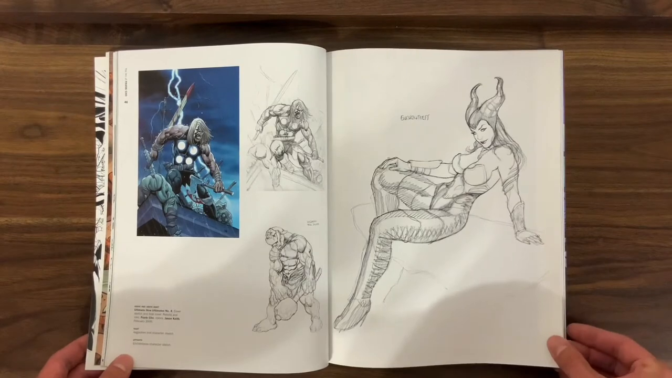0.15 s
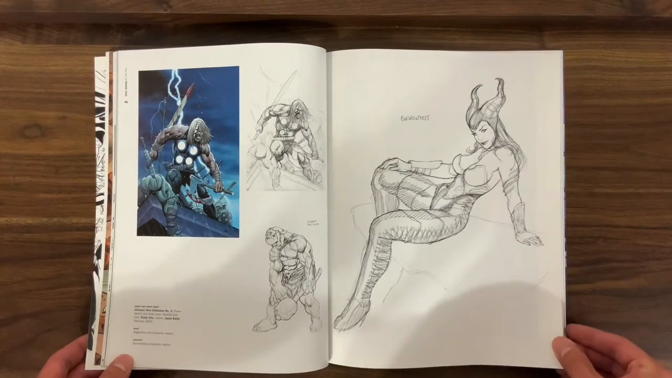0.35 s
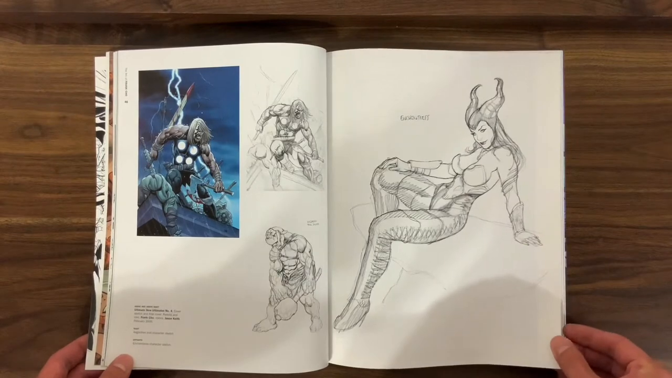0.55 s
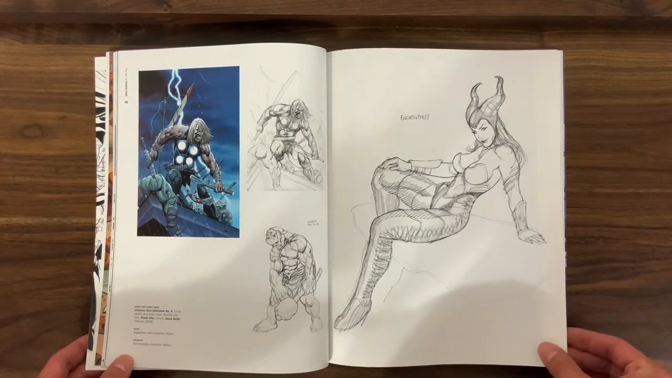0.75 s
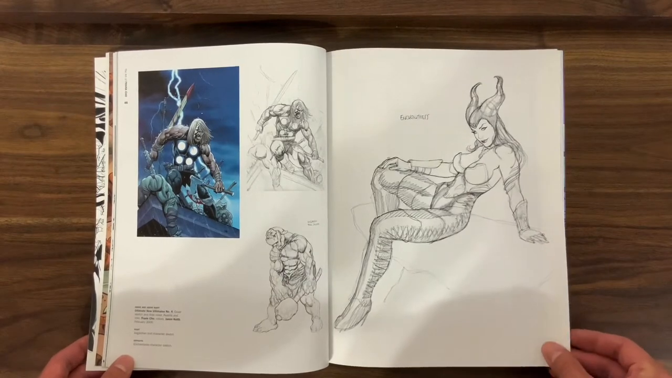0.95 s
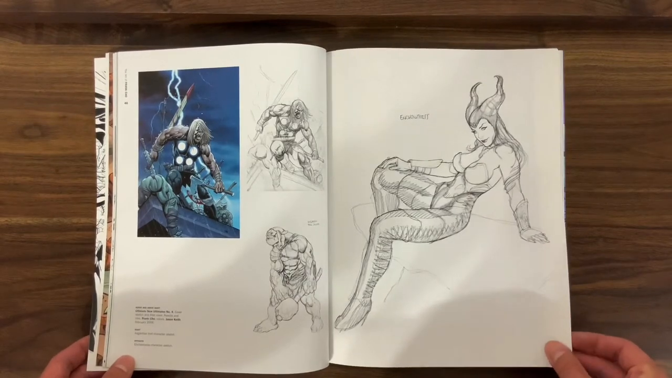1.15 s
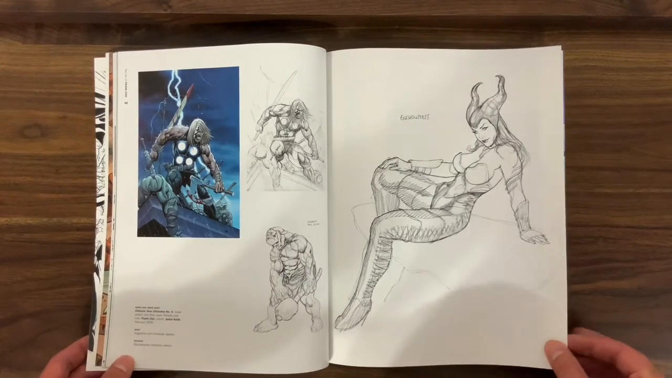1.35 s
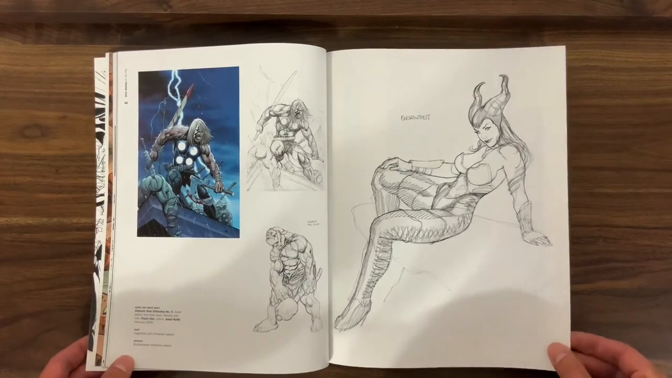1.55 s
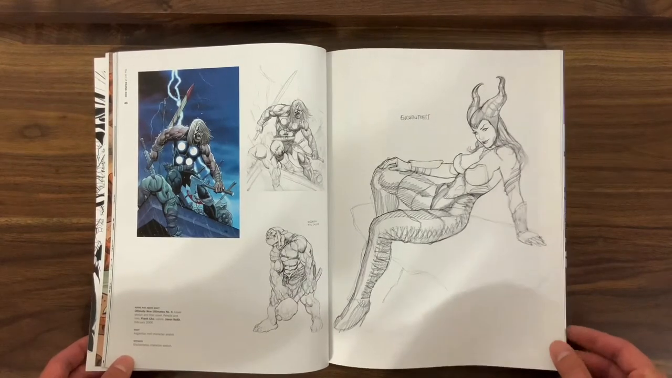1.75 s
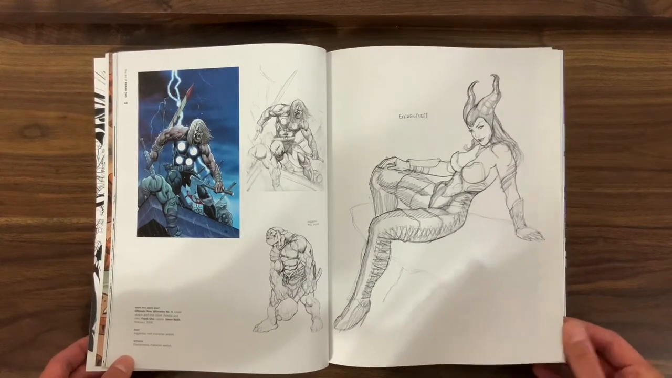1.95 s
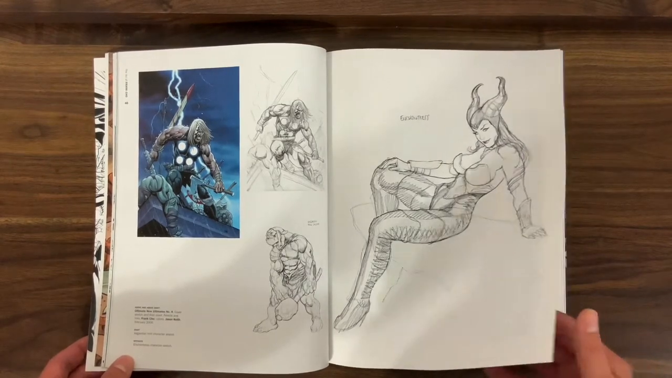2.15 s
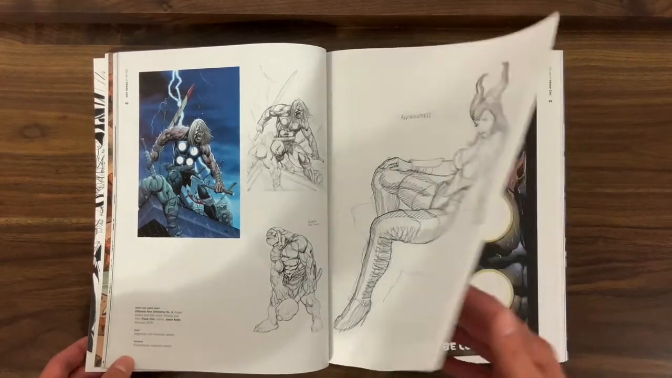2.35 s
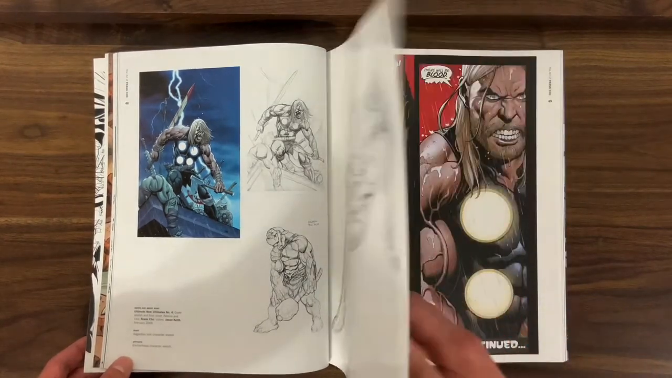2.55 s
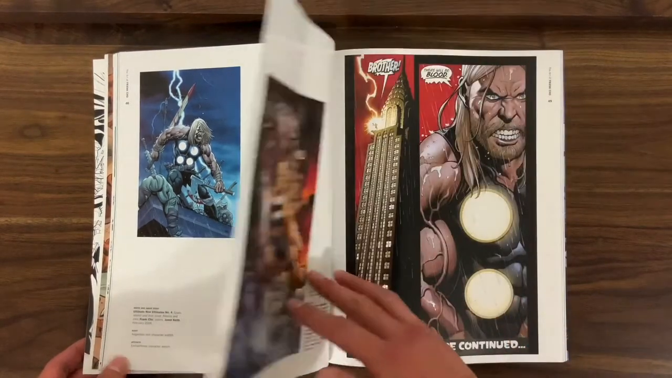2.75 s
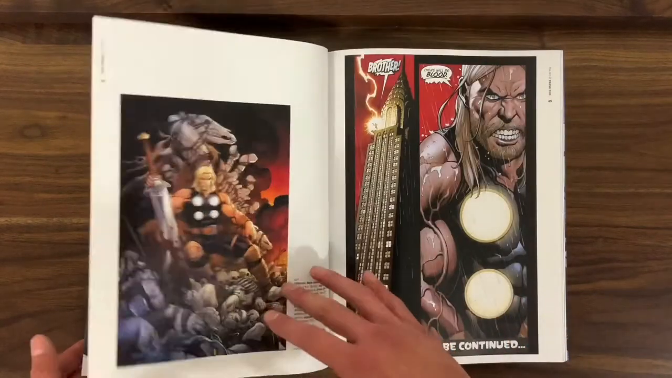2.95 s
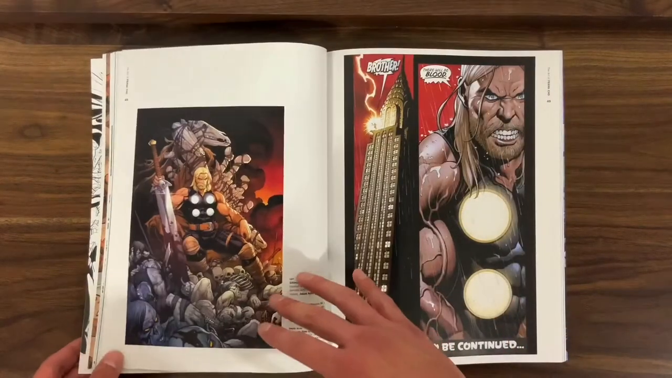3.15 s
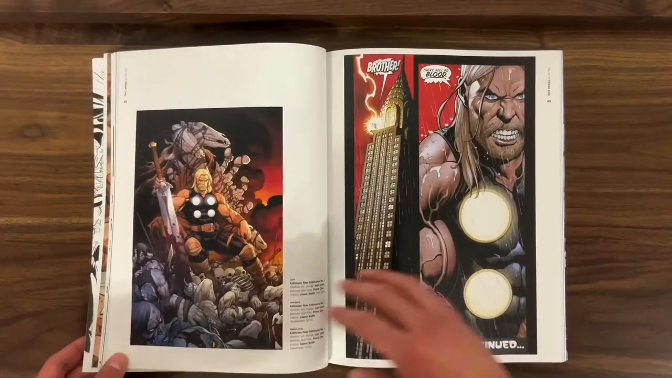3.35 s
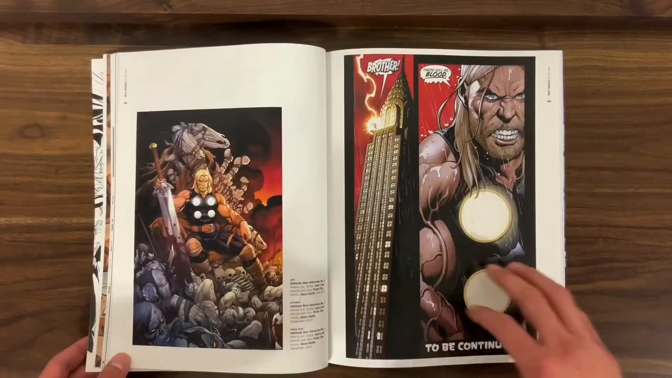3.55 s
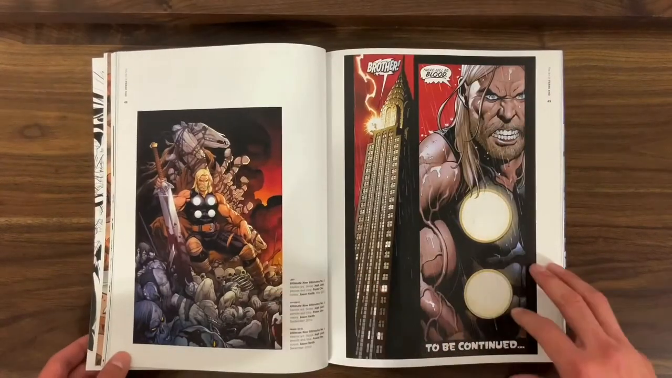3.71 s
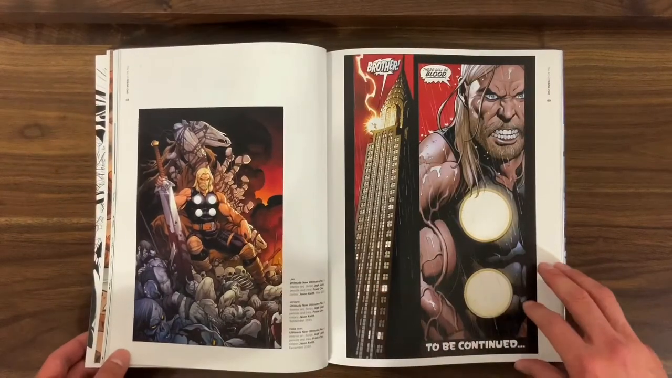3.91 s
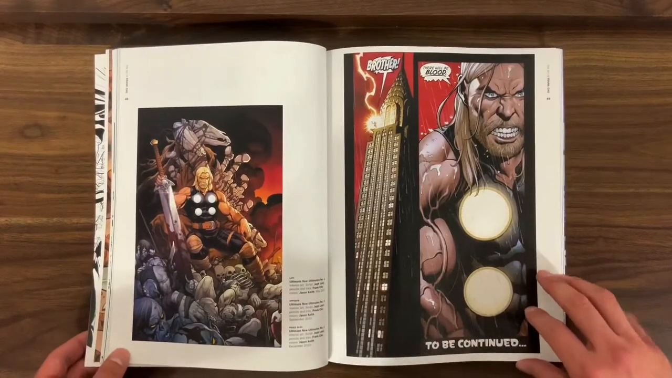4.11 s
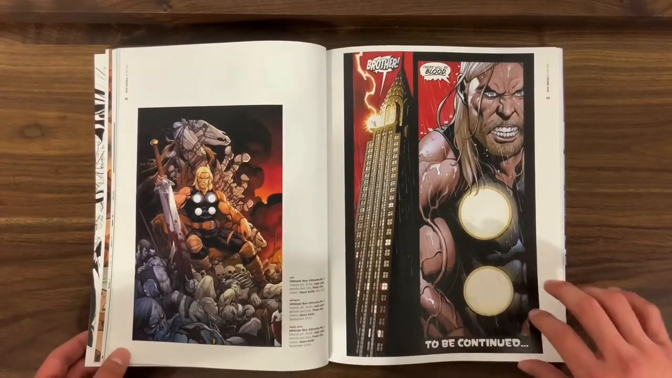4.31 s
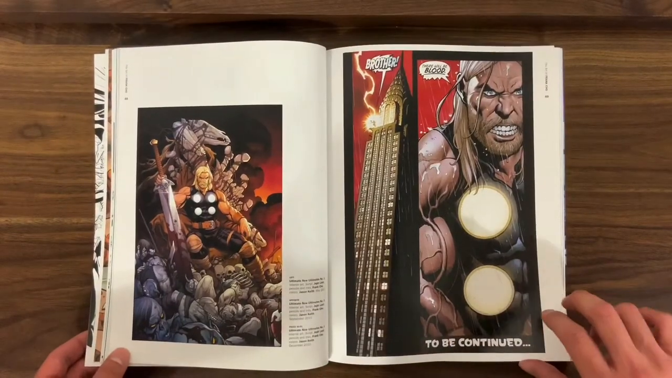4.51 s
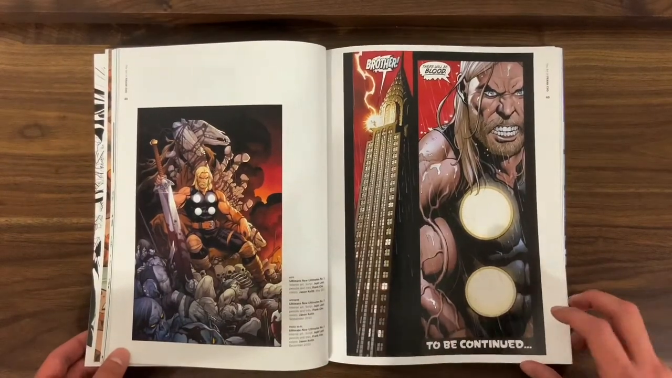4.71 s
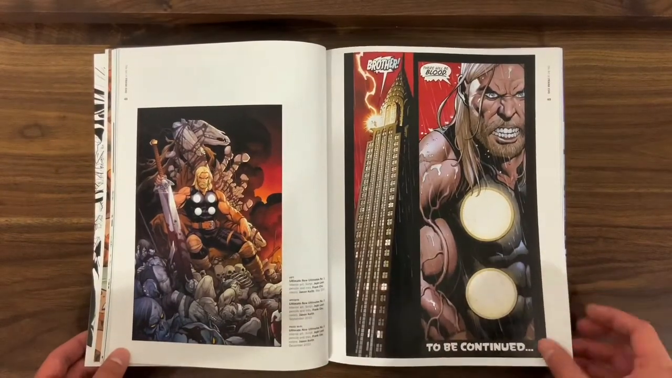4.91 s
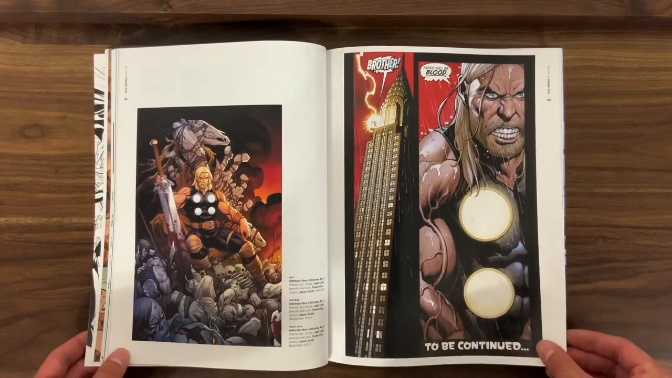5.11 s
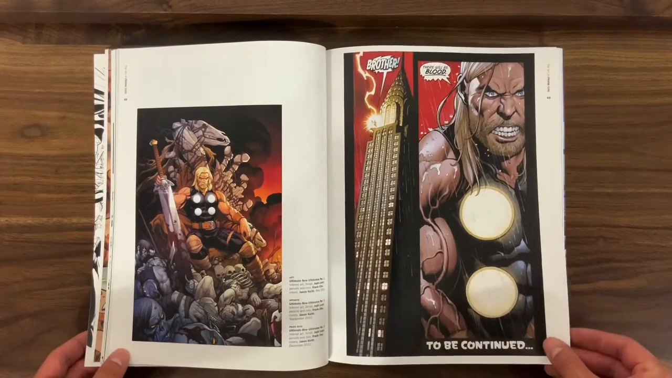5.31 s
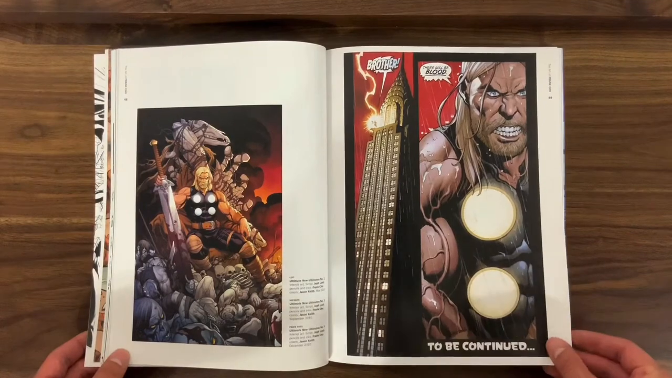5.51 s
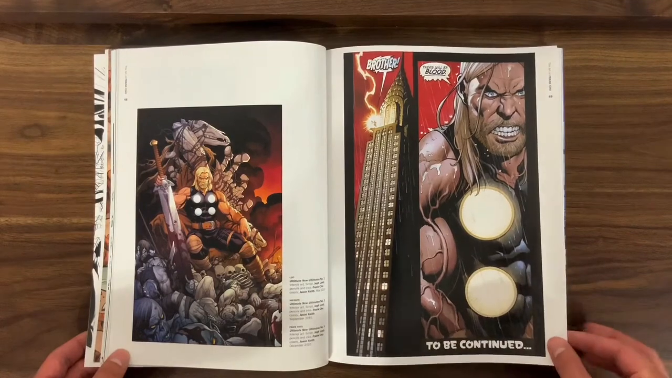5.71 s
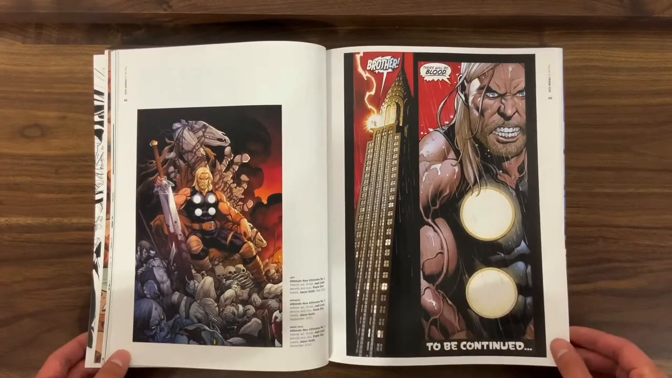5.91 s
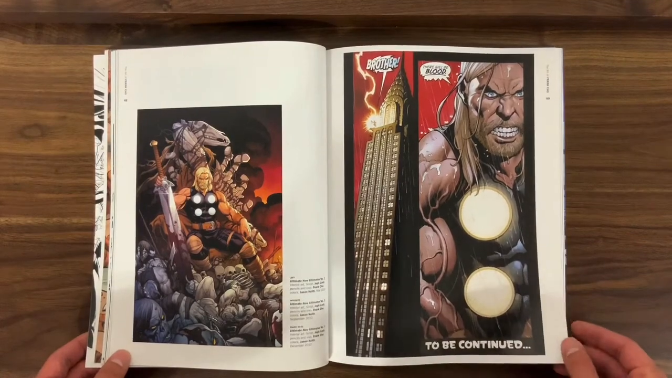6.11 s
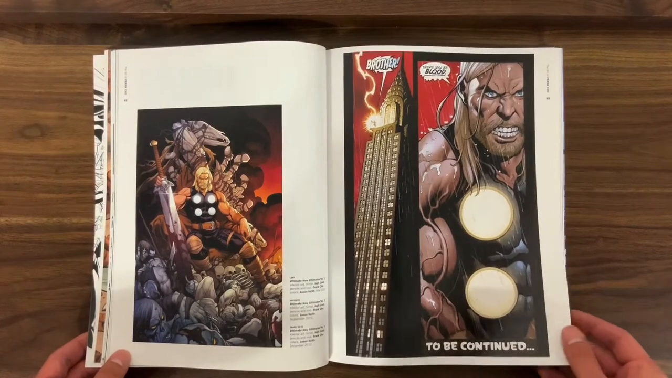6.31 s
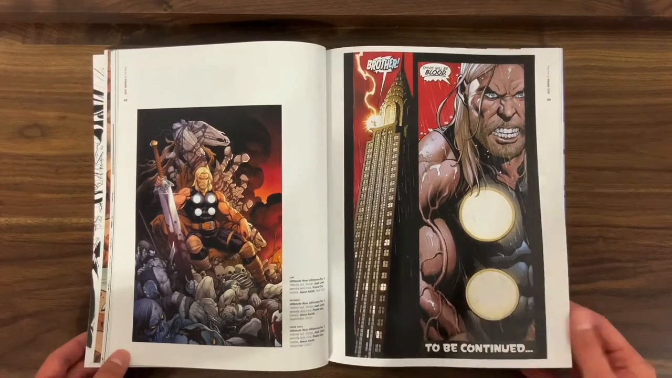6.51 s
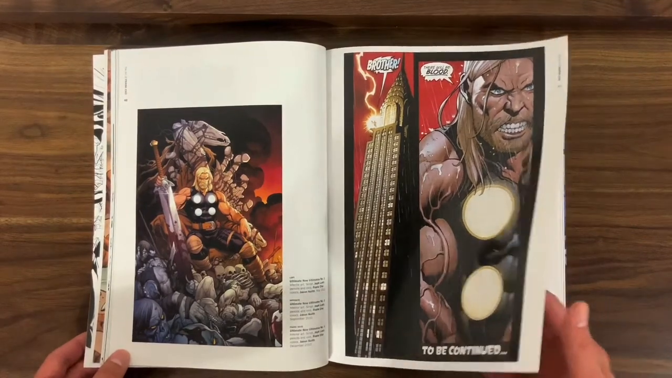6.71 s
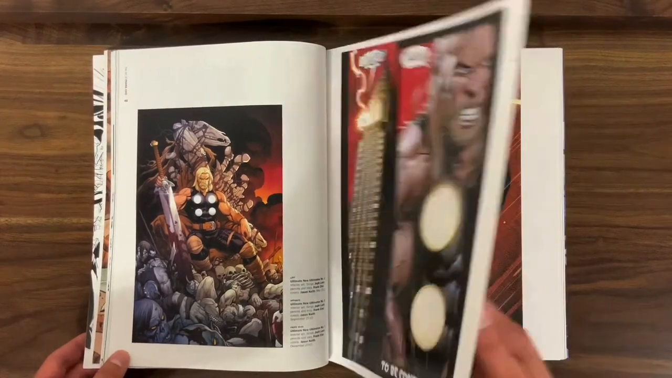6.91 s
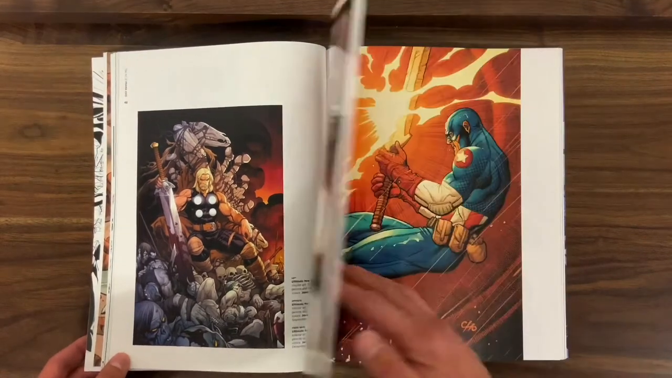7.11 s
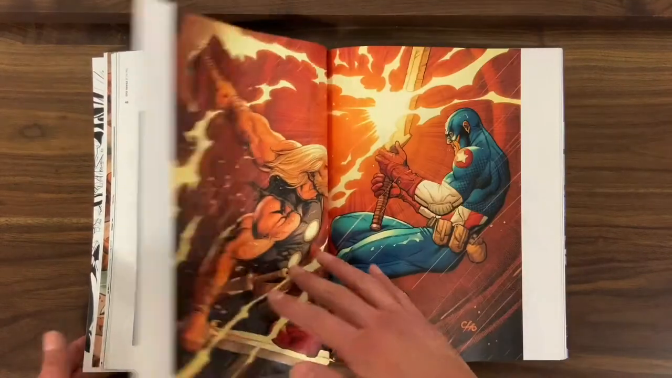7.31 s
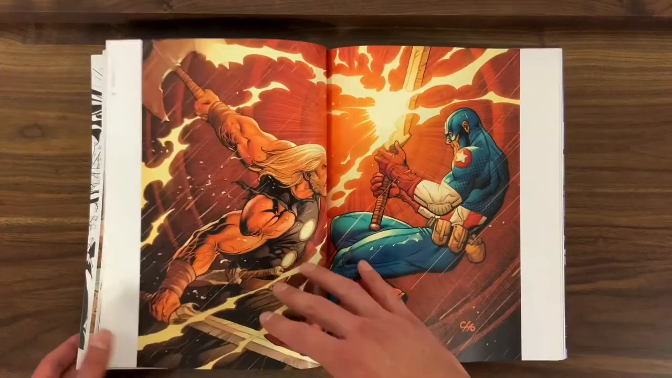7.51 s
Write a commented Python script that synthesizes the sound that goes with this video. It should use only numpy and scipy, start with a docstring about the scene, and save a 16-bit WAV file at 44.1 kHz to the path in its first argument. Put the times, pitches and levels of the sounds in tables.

```python
"""Two stiff glossy pages of a large book are turned on a wooden table, close under two microphones.
Fingers first rub along the paper and tick over the page edges, knocking once on the block of pages.
At 2.5 s the lifted sheet buckles with a dull flap, slides over its neighbour and settles.
After a lull, a second knock at 4.7 s opens more rubs and ticks; the second sheet flaps at 7 s and settles.
A low hum and rumble fill the quiet room throughout."""
import sys
import numpy as np
from scipy import signal
from scipy.fft import rfft, irfft
from scipy.io import wavfile
from scipy.ndimage import uniform_filter1d

SR = 44100
rng = np.random.default_rng(int(sys.argv[2]) if len(sys.argv) > 2 else 0)


def generate_wav(sig):
    """Save sig (samples, or channels by samples) to the path in sys.argv[1] as 16-bit PCM at SR."""
    pcm = np.round(np.clip(np.atleast_2d(sig).T, -1, 1) * 32767).astype(np.int16)
    wavfile.write(sys.argv[1], SR, pcm)


N = 337806
TIME = np.arange(N) / SR


# sheet buckling or landing: t/s, level/dB, rise/s, decay/s, low-pass f/Hz
FLAPS = [(2.0, -76.5, 0.071, 0.3, 1680), (2.476, -55.5, 0.0033, 0.036, 1270),
         (2.538, -47, 0.0072, 0.0095, 2630), (2.558, -60, 0.008, 0.11, 2300),
         (2.747, -54, 0.0008, 0.0064, 885), (2.77, -65, 0.021, 0.07, 1010),
         (6.963, -50.5, 0.0069, 0.047, 3260), (6.972, -57.5, 0.009, 0.056, 1000),
         (7.014, -49, 0.008, 0.0087, 2000), (7.03, -62.5, 0.005, 0.14, 2060),
         (7.455, -60.5, 0.039, 0.043, 644)]
# sheet popping from one curve into the other: t/s, level/dB, low-pass f/Hz
POPS = [(2.481, -33, 1300), (2.5425, -21.5, 1900), (2.549, -23, 1300), (6.9715, -26, 1500),
        (6.988, -24, 1600), (7.022, -28, 1900), (7.0825, -34, 2000)]
# sheet spectrum: f/Hz, level/dB
SHEET_SPECTRUM = [(60, -33), (200, 1), (330, -3), (500, -1), (800, -1.5), (1100, -1), (1600, 0), (2100, 3),
                  (2600, -4), (3300, -7.5), (4200, -14), (6000, -59), (16000, -53)]
# table and room resonances: f/Hz, width/Hz, level/dB
TABLE_ROOM_MODES = [(404, 16, 4), (522, 12, 0), (648, 16, -3), (1086, 14, 0), (1575, 16, 3), (1718, 14, 1)]

def flaps(ring_db=3):
    """The bent sheet pops and sheds dull crinkles; the flap sets the table and room ringing faintly."""
    drive = np.zeros(N)
    crinkles = friction(slips_per_s=1200, spread_db=2, flutter_db=0.5)
    for start, db, rise, decay, cutoff_hz in FLAPS:
        part = crinkles[round(start * SR):][:SR // 2]
        part = part * burst(TIME[:len(part)], rise, decay)
        add(drive, start, amp(db) * lowpass(part, cutoff_hz))
    for start, db, cutoff_hz in POPS:
        add(drive, start, amp(db) * lowpass(signal.unit_impulse(SR // 100), cutoff_hz))
    sheet = colour(drive, SHEET_SPECTRUM)
    ring = sum(amp(db) * signal.lfilter(*signal.iirpeak(hz, hz / width, SR), sheet)
               for hz, width, db in TABLE_ROOM_MODES)
    return sheet + amp(ring_db) * ring


# finger grip, paper hiss and fizz spectra: f/Hz, level/dB
GRIP_SPECTRUM = [(100, -54.5), (250, -1.5), (450, -11.5), (700, -12.5), (1000, -6.5), (1500, -4.5),
                 (2050, 0), (2600, 3), (3300, -7.5), (4200, -18), (6000, -31.5), (16000, -66)]
HISS_SPECTRUM = [(500, -41), (2500, -28.5), (3300, 7), (3900, 6.5), (5500, 9), (7000, 4.5), (8500, 4.5),
                 (10000, -19), (12000, -45), (16000, -41)]
FIZZ_SPECTRUM = [(1000, -78.5), (8000, -11.5), (9700, -6), (12500, -6), (14500, -12.5), (16000, -18.5)]

def rubbing(uneven_db=1.0, uneven_hz=14):
    """Grainy finger grip drives the sheet; paper on paper adds hiss and fizz. Hand pressure is uneven."""
    hiss_gain, grip_gain, fizz_gain, pocket_hz, ring = handling()
    grains = friction(slips_per_s=900, spread_db=2.5, flutter_db=1.5, slip_share=0.4)
    sliding = friction(slips_per_s=1600, spread_db=0, flutter_db=1)
    sliding = air_pocket(sliding + 0.13 * grains, pocket_hz, ring)
    grip = grip_gain * unit_rms(colour(grains, GRIP_SPECTRUM))
    hiss = hiss_gain * unit_rms(colour(sheen(sliding), HISS_SPECTRUM))
    fizz = fizz_gain * unit_rms(colour(sliding, FIZZ_SPECTRUM))
    return (grip + hiss + fizz) * amp(uneven_db * drift(uneven_hz))


# fingertip along the page edges: t/s, length/s, rise/s, hiss/dB, grip/dB, fizz/dB
RUBS = [(0.052, 0.027, 0.029, -62.5, -62, -85), (0.168, 0.044, 0.0046, -72.5, -65.5, -83),
        (0.31, 0.049, 0.022, -67, -60.5, -82), (0.406, 0.046, 0.021, -65.5, -69.5, -70.5),
        (0.556, 0.015, 0.0089, -57.5, -60, -73), (0.628, 0.17, 0.1, -68.5, -63, -77),
        (0.893, 0.083, 0.013, -62.5, -58.5, -66), (1.003, 0.088, 0.0041, -65.5, -57.5, -65.5),
        (1.086, 0.059, .02, -66, -63, -65), (1.44, 0.013, 0.049, -54.5, -47, -60.5),
        (1.535, 0.041, 0.035, -81, -47, -66), (1.699, 0.12, 0.0053, -60.5, -61, -70),
        (3.302, .05, 0.033, -82, -78, -92), (3.647, 0.23, 0.068, -74.5, -76.5, -76),
        (4.513, 0.16, 0.059, -104, -86, -102), (4.66, 0.051, 0.0091, -62, -62, -64),
        (4.728, 0.041, 0.03, -63, -63, -70), (4.991, 0.014, 0.0074, -63, -61, -61),
        (5.274, 0.094, 0.035, -62, -56.5, -63.5), (5.394, 0.05, 0.016, -63.5, -56, -65),
        (5.507, 0.044, 0.029, -65, -60.5, -65), (5.739, 0.14, 0.13, -62, -61.5, -67),
        (5.935, 0.14, 0.0087, -62, -61, -63.5), (6.087, 0.049, 0.012, -55, -59, -65),
        (6.428, 0.037, 0.028, -63.5, -67, -64)]
# loose sheet over its neighbour: t/s, length/s, hiss/dB, grip/dB, fizz/dB, pocket f/Hz, ring/0-1
SLIDES = [(1.98, 0.23, -69, -70, -66.5, 5800, 0.12), (2.186, 0.16, -67, -70.5, -67, 6400, 0.06),
          (2.321, 0.14, -72.5, -71.5, -69, 6330, 0.15), (2.468, 0.38, -80, -72, -87, 6600, 0.37),
          (2.853, 0.16, -77.5, -80, -95, 6030, 0.75), (3.016, 0.1, -72, -76, -87, 5930, 0.8),
          (3.15, 0.1, -75.5, -75, -89, 4530, 0.15), (3.935, 0.065, -80, -82, -102, 5350, 1),
          (4.36, .05, -81, -84, -84, 7600, 0.9), (4.78, 0.15, -82.5, -82, -87, 4370, 0.4),
          (5.019, 0.17, -70.5, -69, -81, 4600, 0.5), (5.09, 0.058, -65.5, -68, -69, 7800, 0.4),
          (6.154, 0.3, -78, -80.5, -87, 7750, 0.6), (6.457, 0.12, -73.5, -65.5, -73, 6200, 0.5),
          (6.596, 0.21, -68.5, -67.5, -65.5, 3530, 0.2), (6.776, 0.15, -70.5, -72.5, -68, 3700, 0.05),
          (6.931, 0.23, -72, -71, -76, 6250, 0.23), (7.262, 0.15, -70, -72, -87, 5800, 0.02),
          (7.421, 0.088, -72.5, -72, -73.5, 6140, 0.3), (7.533, 0.2, -74, -85, -79.5, 6050, 0.3)]
# finger under the sheet, widening or narrowing the air pocket:
# t/s, length/s, rise/s, hiss/dB, grip/dB, fizz/dB, pocket start f/Hz, end f/Hz, ring/0-1
WEDGES = [(0.237, 0.099, 0.018, -71, -75, -68, 9500, 7000, 0.7),
          (0.673, 0.064, 0.032, -64, -67, -69, 6340, 4630, 0.2),
          (0.792, 0.098, 0.082, -58, -59.5, -60, 8300, 4930, 0.3),
          (1.149, 0.061, 0.023, -60.5, -60.5, -64.5, 5300, 3900, 0.1),
          (1.218, 0.07, 0.025, -58.5, -62.5, -61.5, 5000, 5500, 0.13),
          (1.771, 0.044, 0.02, -51.5, -51.5, -63.5, 6100, 4160, 0.18),
          (1.859, 0.093, 0.048, -55.5, -54, -64, 5950, 7100, .2),
          (5.145, 0.088, 0.023, -63.5, -77, -59, 8000, 6800, 0.8),
          (5.205, 0.067, 0.06, -52, -56, -54.5, 6000, 3920, 0.42),
          (5.541, 0.13, 0.027, -65, -68.5, -65.5, 3830, 5830, 0.3)]

def handling(pressed_hz=4120, pressed_ring=0.024, slide_rise_s=0.045):
    """Hiss, grip and fizz gains of all strokes; the loudest hiss sets the pocket's pitch and ring."""
    t = TIME[::32]
    strokes = [(*row, pressed_hz, pressed_ring) for row in RUBS]
    strokes += [(start, length, slide_rise_s, *rest) for start, length, *rest in SLIDES]
    for start, length, *rest, from_hz, to_hz, strength in WEDGES:
        glide = np.clip((t - start) / length, 0, 1) ** 0.9
        strokes.append((start, length, *rest, from_hz * (to_hz / from_hz) ** glide, strength))
    power = np.full((3, len(t)), 1e-16)
    loudest, pocket_hz, ring = 0, pressed_hz, pressed_ring
    for start, length, rise, hiss_db, grip_db, fizz_db, hz, strength in strokes:
        stroke_power = (amp([[hiss_db], [grip_db], [fizz_db]]) * stroke(t - start, length, rise)) ** 2
        leads = stroke_power[0] > loudest
        pocket_hz = np.where(leads, hz, pocket_hz)
        ring = np.where(leads, strength, ring)
        loudest = np.maximum(loudest, stroke_power[0])
        power += stroke_power
    return [np.interp(TIME, t, curve) for curve in (*np.sqrt(power), pocket_hz, ring)]


def stroke(t, length, rise, lead_s=0.049, sag_db=-2.5, release_s=0.019, linger_s=0.07):
    """Stroke gain: the hand brushes, gathers speed, slackens and stops; the paper shifts on faintly."""
    lead, linger = amp(-23), amp(-16)
    after = np.maximum(t - length, 0)
    attack = lead * np.exp(np.minimum(t, 0) / lead_s) + (1 - lead) * np.clip(t / rise, 0, 1)
    sag = amp(sag_db * np.clip(t / length, 0, 1))
    release = (1 - linger) * np.exp(-after / release_s) + linger * np.exp(-after / linger_s)
    return attack * sag * release


def friction(slips_per_s, spread_db, flutter_db, slip_share=0.33):
    """Countless tiny slips merge to noise; some larger ones stand out, and the contact flutters."""
    slips = rng.standard_normal(N).clip(-1, 1)
    slips *= amp(spread_db * np.minimum(rng.exponential(1, N), 4))
    slips = unit_rms(slips * (rng.random(N) < slips_per_s / SR))
    noise = np.sqrt(slip_share) * slips + np.sqrt(1 - slip_share) * rng.standard_normal(N)
    return unit_rms(noise * amp(flutter_db * drift(70)))


# air pocket modes: frequency ratio, stage width/Hz, gain
POCKET_MODES = [(1, 1400, 4.0), (1.8, 2000, 2.4)]

def air_pocket(x, hz, strength, wander=0.04):
    """The gap under the sheet rings, glides as it opens and shuts, and wavers as the sheet bends."""
    hz = hz * np.exp(wander * drift(16))
    ring = sum(gain * resonate(x, ratio * hz, width) for ratio, width, gain in POCKET_MODES)
    x = shifting_contact(x + strength * ring)
    return x / np.sqrt(uniform_filter1d(x ** 2, size=SR // 20))  # hold the loudness even


def shifting_contact(x, depth_db=2.4):
    """The contact keeps shifting, so the colour of the hiss changes in small irregular patches."""
    spectra = signal.stft(x, nperseg=256)[2]
    patches = uniform_filter1d(rng.standard_normal(spectra.shape), size=4, axis=0)
    patches = unit_rms(uniform_filter1d(patches, size=14, axis=1))
    return signal.istft(spectra * amp(depth_db * patches), nperseg=256)[1][:N]


# glossy sheet resonances: f/Hz, stage width/Hz, gain
SHEEN_MODES = [(3750, 500, .5), (6450, 550, .55), (8500, 700, .3)]

def sheen(x, wander=0.024):
    """Narrow resonances of the curved sheet waver as it bends."""
    bend = np.exp(wander * drift(3.8))
    return x + sum(gain * resonate(x, hz * bend, width) for hz, width, gain in SHEEN_MODES)


# page edges slipping off a finger or each other: t/s, body/dB, crisp/dB, decay/s, f/Hz
TICKS = [(0.062, -41, -49, 0.0031, 2020), (0.177, -24, -29.5, 0.0019, 2060),
         (0.288, -25.5, -30.5, .0037, 2060), (0.331, -36, -33, 0.0064, 2170), (0.36, -35, -40, .0033, 2090),
         (0.741, -37, -54, 0.0011, 1900), (0.818, -34.5, -46, .0013, 1900),
         (0.844, -32.5, -45, .0018, 1900), (0.935, -27, -45, 0.0016, 2000), (0.959, -34, -44, .0007, 2100),
         (1.003, -25.5, -33, .0015, 2080), (1.02, -24, -37, 0.0042, 1940),
         (1.039, -30.5, -47, 0.0023, 1500), (1.11, -23, -38, 0.0011, 1850),
         (1.1485, -21.5, -38, 0.002, 2000), (1.197, -30, -40, .0013, 2080),
         (1.454, -28.5, -33.5, 0.00066, 1730), (1.568, -27, -33, .003, 1820),
         (1.5748, -25, -29.5, .0051, 1980), (1.602, -21.5, -29, 0.0031, 1680),
         (1.709, -15, -42, 0.00075, 1820), (1.746, -25, -27, .0025, 1750), (2.734, -59, -36.5, 0.012, 2790),
         (2.746, -42, -35, .0026, 2880), (3.155, -51, -37.5, 0.011, 2830), (3.81, -45, -40, 0.0034, 2900),
         (3.859, -44, -35.5, 0.0022, 2900), (4.703, -34, -29, 0.003, 1800), (4.998, -35, -37, .0096, 2480),
         (5.394, -27.5, -45, 0.0021, 2100), (5.4956, -25, -36, 0.0012, 1780), (5.53, -38, -50, .0012, 1910),
         (5.822, -34, -40, .001, 1820), (5.94, -24.5, -49, 0.0028, 2000), (6.008, -28.5, -37, 0.0025, 2090),
         (6.022, -38, -46, .001, 1700), (6.458, -30, -35.5, 0.01, 2160), (6.964, -22, -32.5, 0.0026, 2040),
         (6.97, -19, -44, 0.0032, 1570), (6.9731, -15.5, -34, .007, 1960), (7.112, -40, -44, .0022, 2080)]
# body and crisp spectra of an edge: f/Hz, level/dB
EDGE_SPECTRUM = [(100, -32), (400, -10), (800, -7), (1400, -5), (2050, 5), (2700, 7), (3400, -3.5),
                 (4500, -15), (8000, -22.5), (16000, -66.5)]
CRISP_SPECTRUM = [(500, -30), (2500, -15), (3800, 4.5), (7000, 3.5), (9500, 0.5), (12000, -4.5),
                  (16000, -10)]

def ticks(snap_s=0.0006, reference_hz=2000):
    """Each edge lets go with one snap and a short scrape; a longer free edge sounds lower."""
    out, t = np.zeros(N), TIME[:SR // 12]
    for start, body_db, crisp_db, decay, hz in TICKS:
        scrape = rng.standard_normal(len(t)) * np.exp(-t / decay)
        scrape /= np.linalg.norm(scrape)
        scrape[0] = np.sqrt(snap_s / decay)  # shorter slip, more snap
        scrape /= np.linalg.norm(scrape)
        for db, spectrum in (body_db, EDGE_SPECTRUM), (crisp_db, CRISP_SPECTRUM):
            shifted = np.multiply(spectrum, [hz / reference_hz, 1])
            add(out, start, amp(db) * colour(scrape, shifted, size=2048))
    return out


def crackle(snaps_per_s=70, spread_db=1, body_db=15):
    """Small creases let go at random, as hard as the fingers grip."""
    grip_gain = handling()[1]
    onsets = rng.random(N) < snaps_per_s / SR
    sizes = amp(spread_db * np.minimum(rng.exponential(1, N), 2))
    return amp(body_db) * colour(onsets * sizes * grip_gain, EDGE_SPECTRUM)


# corner flicks: t/s, level/dB, rise/s, decay/s
FLICKS = [(0.563, -56, 0.0056, 0.0039), (1.942, -54, .005, 0.0063), (6.032, -47, .005, 0.0078),
          (6.095, -44, .01, 0.012), (6.113, -53, .002, .006)]
# rasp spectrum: f/Hz, level/dB
FLICK_SPECTRUM = [(500, -23), (1400, -22), (2100, 11.5), (2700, 5), (3500, 9.5), (4800, -10), (6700, -7.5),
                  (8500, 1), (10000, -13.5), (16000, 0)]

def flicks():
    """A page corner rasps over the thumb in a quick run of slips."""
    gain = np.zeros(N)
    for start, db, rise, decay in FLICKS:
        add(gain, start, amp(db) * burst(TIME[:SR // 5], rise, decay))
    return colour(gain * friction(slips_per_s=1200, spread_db=2, flutter_db=1), FLICK_SPECTRUM)


# finger knocks: t/s, level/dB, f/Hz, tilt/(dB per octave), t60/s
KNOCKS = [(1.236, -45, 594, -1, 0.021), (4.701, -45, 657, 2.5, 0.042)]
# page block modes: frequency ratio, level/dB, t60 ratio
BLOCK_MODES = [(1, 6, 0.8), (1.66, 4, .45), (2.03, 1.5, 0.57), (2.44, 2, 0.63), (3.12, 2, .6)]

def knocks(rise_s=0.0028, highpass_hz=450):
    """The block of pages answers a soft fingertip with a short hollow ring."""
    out, t = np.zeros(N), TIME[:SR // 5]
    for start, db, hz, tilt, t60 in KNOCKS:
        ring = np.zeros(len(t))
        for ratio, mode_db, t60_ratio in BLOCK_MODES:
            envelope = amp(mode_db + tilt * np.log2(ratio) - 60 * t / (t60 * t60_ratio))
            ring += envelope * np.sin(2 * np.pi * ratio * hz * t)
        add(out, start, amp(db) * np.minimum(t / rise_s, 1) * ring)
    return signal.lfilter(*signal.butter(2, highpass_hz, "high", fs=SR), out)


# left channel behind right: f/Hz, lag/turns
LEFT_LAG = [(20, 0), (800, .02), (1500, .1), (2000, .29), (2700, .5), (3700, .84), (4700, 1), (16000, 1)]

def stereo_lag(x):
    """The left channel lags in the midrange; bass and top treble sound centred."""
    lag = np.exp(-2j * np.pi * at_hz(LEFT_LAG, np.fft.rfftfreq(N, 1 / SR)))
    return np.array([irfft(rfft(x) * lag, N), x])


# reverberation time: f/Hz, t60/s
ROOM_T60 = [(200, .45), (1500, .42), (3000, .3), (8000, .2), (16000, .13)]
# reverberation gain: f/Hz, level/dB
ROOM_WET = [(200, -3), (700, 1.5), (1400, 1), (2600, -13.5), (5000, -4), (16000, -6.5)]

def room(x, early_gain=0.52, early_s=0.012):
    """A diffuse tail for each microphone, strongest just after the sound, its treble dying first."""
    hz, t, noise = signal.stft(rng.standard_normal((2, SR // 2)), SR, nperseg=256)
    fade = amp(-60 * t / at_hz(ROOM_T60, hz)[:, None])
    fade *= 1 + early_gain * np.exp(-t / early_s)
    fade /= np.sqrt(np.mean(fade ** 2, axis=1, keepdims=True) * SR / 2)  # unit energy per band
    wet_gain = amp(at_hz(ROOM_WET, hz))[:, None]
    tail = signal.istft(noise * fade * wet_gain, SR, nperseg=256)[1]
    delayed = np.pad(tail, ((0, 0), (SR // 700, 0)))
    return signal.fftconvolve(x[None], delayed, axes=1)[:, :N]


# hum swell: t/s, relative level/dB
HUM_SWELL = [(0, -58.5), (1.9, -56), (3.1, -45), (4.6, -54.5), (5.4, -48.5), (5.9, -44), (7.0, -40.5),
             (7.3, -56), (7.66, -43.5)]

def hum(hz=74.72, gain_db=-4.5, octave_db=-15, waver_hz=0.53, waver_db=2.5):
    """A low hum with its octave swells and wavers."""
    swell_db = np.interp(TIME, *np.transpose(HUM_SWELL))
    phase = 2 * np.pi * np.cumsum(hz + waver_hz * drift(2.42)) / SR
    gain = np.sqrt(2) * amp(swell_db + gain_db + waver_db * drift(2.8))
    return gain * (np.sin(phase) + amp(octave_db) * np.sin(2 * phase))


# room rumble and air spectra: f/Hz, level/dB
RUMBLE_SPECTRUM = [(15, -54.5), (30, -36.5), (40, -17), (55, -3), (70, -5.5), (85, 2.5), (100, -10),
                   (118, 0), (135, -17), (170, -20), (215, -23), (260, -30), (400, -38.5), (1000, -76.5)]
AIR_SPECTRUM = [(60, -16.5), (200, 1), (300, -1.5), (450, -3), (750, -0.5), (1000, -2.5), (1200, -4.5),
                (1500, -1.5), (1800, -23), (2600, -28), (3500, -30.5), (8000, -27), (16000, -28)]

def room_tone(rumble_db=-50, side_ratio_db=-25.5, air_db=-71):
    """A low rumble, almost alike at both microphones, and faint diffuse air."""
    mid, side = [unit_rms(colour(rng.standard_normal(N), RUMBLE_SPECTRUM)) for _ in range(2)]
    rumble = mid + amp(side_ratio_db) * np.array([side, -side])
    air = np.array([colour(rng.standard_normal(N), AIR_SPECTRUM) for _ in range(2)])
    return amp(rumble_db) * rumble + amp(air_db) * unit_rms(air + 0.11 * air[::-1])


def amp(db):
    """Decibels to gain."""
    return 10 ** (np.asarray(db) / 20)


def unit_rms(x):
    """Scales to rms 1."""
    return x / np.sqrt(np.mean(x ** 2) + 1e-20)


def at_hz(table, hz):
    """Interpolates a table over log frequency."""
    f, value = np.transpose(table)
    return np.interp(np.log(hz + 1), np.log(f + 1), value)


def add(mix, start_s, sound):
    """Mixes a sound in at start_s."""
    part = mix[round(start_s * SR):][:len(sound)]
    part += sound[:len(part)]


def burst(t, rise, decay):
    """Linear rise, exponential decay."""
    return np.minimum(t / rise, 1) * np.exp(-np.maximum(t - rise, 0) / decay)


def drift(cutoff_hz):
    """Slow random curve of rms 1."""
    hz = np.fft.rfftfreq(N, 1 / SR)
    return unit_rms(irfft(rfft(rng.standard_normal(N)) / (1 + (hz / cutoff_hz) ** 4), N))


def colour(x, spectrum, size=8192):
    """Minimum-phase filter of unit energy, shaped by the spectrum."""
    log_gain = np.log(amp(at_hz(spectrum, abs(np.fft.fftfreq(size, 1 / SR)))))
    response = np.exp(np.conj(signal.hilbert(log_gain)))
    impulse = np.fft.ifft(response).real[:size // 2]
    return signal.oaconvolve(x, impulse / np.linalg.norm(impulse))[:len(x)]


def resonate(x, hz, width_hz):
    """Two resonant stages of gain 1 that follow the curve hz."""
    carrier = np.exp(2j * np.pi * np.cumsum(hz) / SR)
    pole = np.exp(-np.pi * width_hz / SR)
    for _ in range(2):
        x = 2 * (carrier * signal.lfilter([1 - pole], [1, -pole], x / carrier)).real
    return x


def lowpass(x, hz):
    """Third-order low-pass."""
    return signal.lfilter(*signal.butter(3, hz, fs=SR), x)


def scene():
    """Paper sounds arrive directly and by the room; the upright sheet throws more flap into the room."""
    near = rubbing() + crackle() + ticks() + flicks() + knocks()
    flap = flaps()
    return stereo_lag(near + amp(5.5) * flap) + room(near + amp(6.5) * flap) + hum() + room_tone()


def record(dry):
    """Band limit at 16 kHz."""
    taps = signal.firwin(511, 16000, window=("kaiser", 9), fs=SR)
    return signal.oaconvolve(dry, taps[None], "same")


dry = scene()
out = record(dry)
generate_wav(out)
```